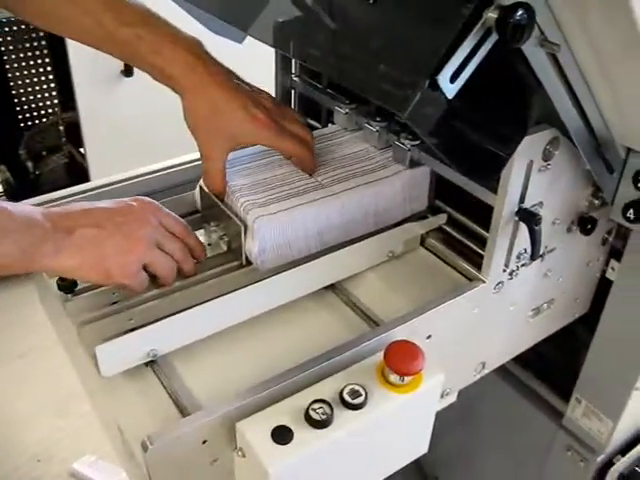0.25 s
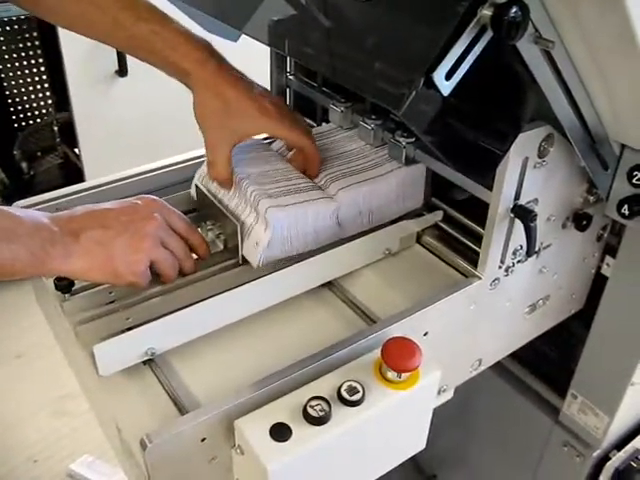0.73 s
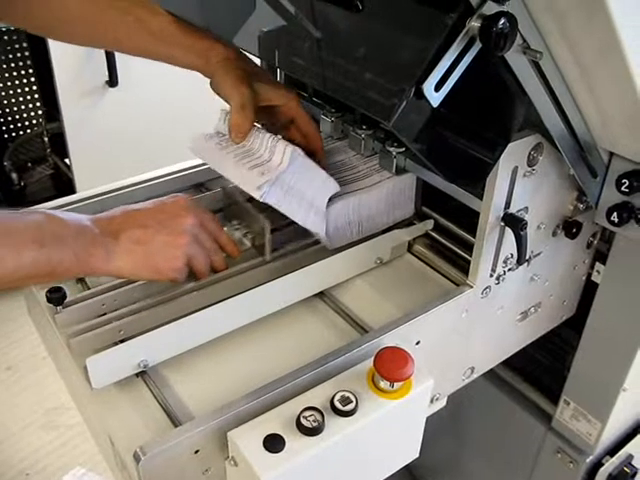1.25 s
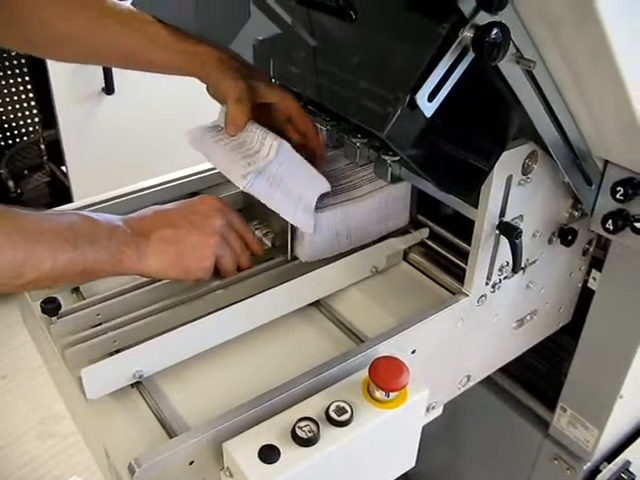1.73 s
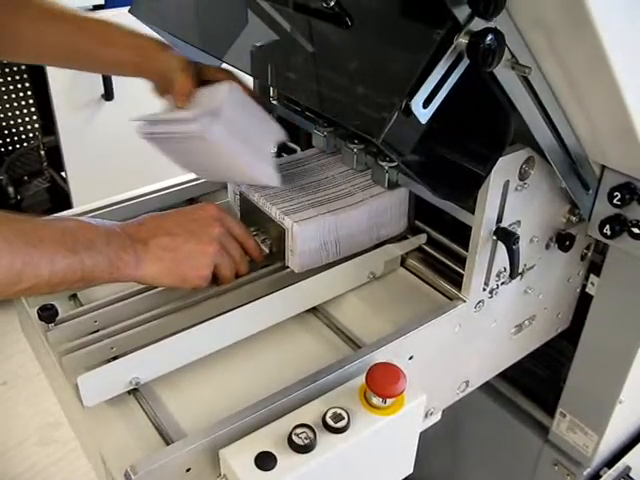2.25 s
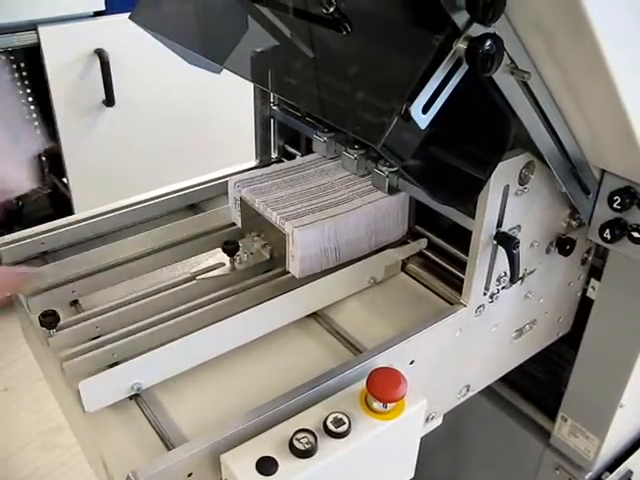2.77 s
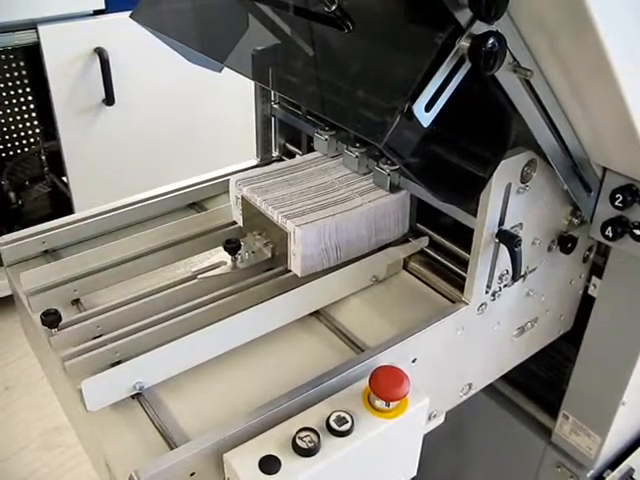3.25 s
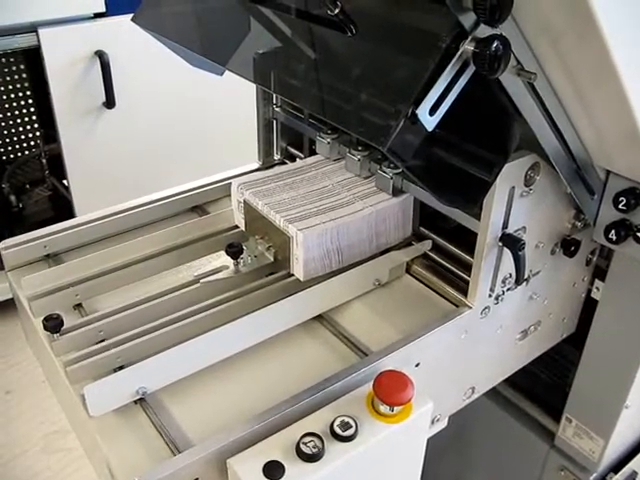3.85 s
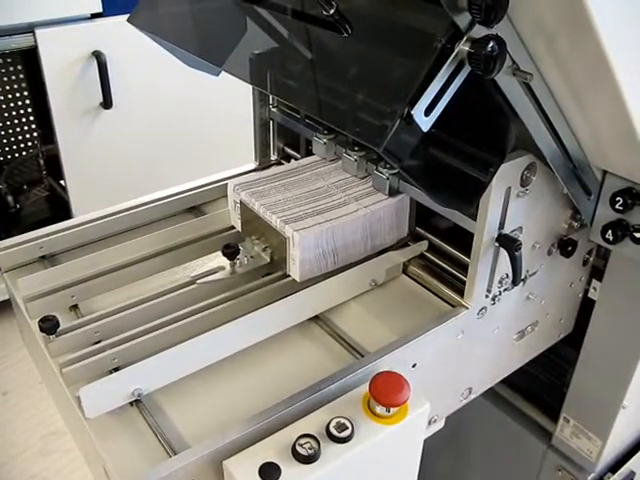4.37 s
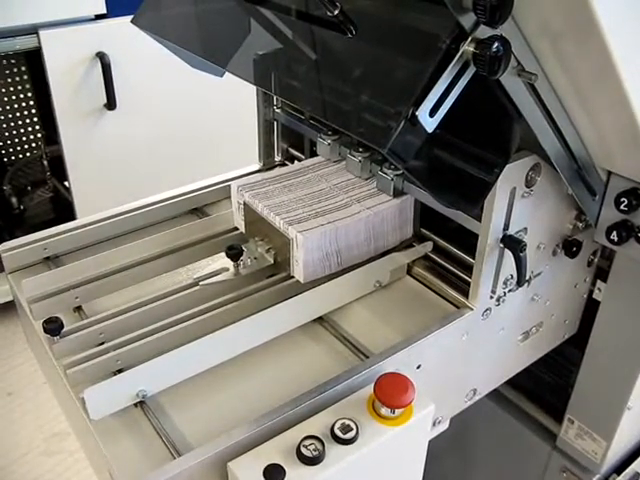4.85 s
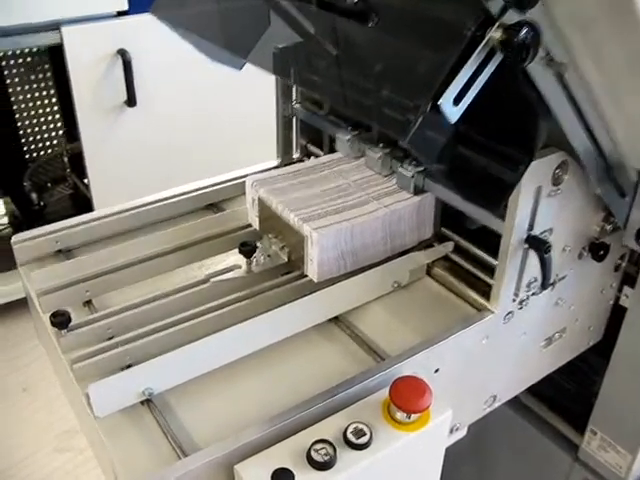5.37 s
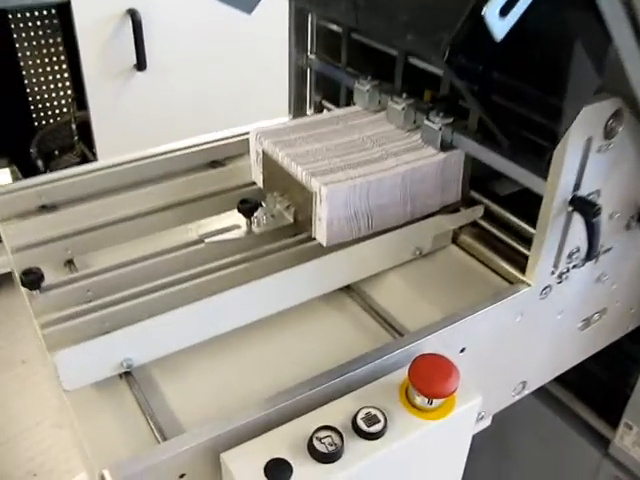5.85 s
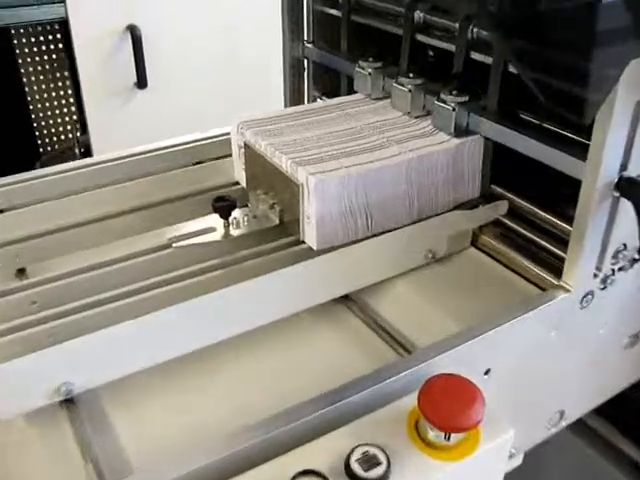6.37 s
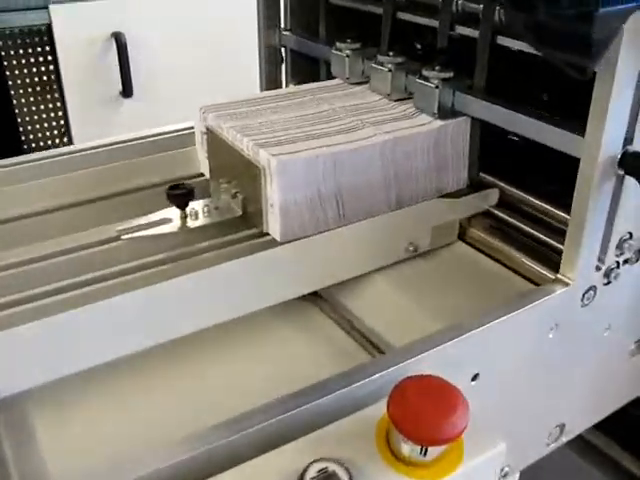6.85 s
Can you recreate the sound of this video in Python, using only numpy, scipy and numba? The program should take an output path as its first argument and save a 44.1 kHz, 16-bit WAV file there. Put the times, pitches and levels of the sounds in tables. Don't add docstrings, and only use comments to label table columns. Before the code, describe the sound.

Close to a paper folding machine in a print shop, sheets snap through rollers about seven times a second, each a tight cluster of dry cracks and rustle. Soft frame knocks and a faint low groan follow the feeder strokes. Suction air hisses over rumble. One beat nearly drops out near three seconds; later the rhythm slows slightly and bearings squeal. A small camera microphone a metre away compresses the peaks.

```python
import sys
import numpy as np
from scipy import signal
from scipy.fft import rfft, irfft
from scipy.io import wavfile
from scipy.ndimage import uniform_filter1d
from numba import njit

SR = 44100
rng = np.random.default_rng(int(sys.argv[2]) if len(sys.argv) > 2 else 0)


def inscribe(sig):
    pcm = np.round(np.clip(np.atleast_2d(sig).T, -1, 1) * 32767)
    wavfile.write(sys.argv[1], SR, pcm.astype(np.int16))


def invert_db(level):
    return 10 ** (np.asarray(level, dtype=float) / 20)


N = 313551


def level(x, db):
    return x * invert_db(db) / np.sqrt(np.mean(x ** 2))


def resonance(x, hz, width_hz):
    return signal.lfilter(*signal.iirpeak(hz, hz / width_hz, fs=SR), x)


def roller_gap(x, modes):
    out = 0
    for j, (hz, width_hz, db) in enumerate(modes):
        gain = (-1) ** j * invert_db(db) * np.sqrt(2000 / width_hz)
        out = out + gain * resonance(x, hz, width_hz)
    return out


def walk(rate_hz):
    k = int(SR / rate_hz)
    held = np.repeat(rng.standard_normal(N // k + 1), k)
    return 1.94 * uniform_filter1d(uniform_filter1d(held, k), k)[:N]


def swell(seconds):
    t = np.arange(-3 * seconds * SR, 3 * seconds * SR) / SR
    return t, np.sqrt(2) * np.exp(-.5 * (t / seconds) ** 2)


def gate(start_s, end_s):
    t = np.arange(N) / SR
    return np.clip(np.minimum(t - start_s, end_s - t) / .015 + .5, 0, 1)


def add(out, s, x):
    i = int(s * SR)
    x = x[max(-i, 0):max(N - i, 0)]
    out[max(i, 0):max(i, 0) + len(x)] += x


# last snap t/s, last snap level/dB, third snap level/dB
SHEETS = [(0.028, -8.5, -10), (0.1743, -9.5, -7), (0.3214, -9.5, -8), (0.462, -13.5, -15),
          (0.6001, -10, -11), (0.7418, -13.5, -9.5), (0.8848, -9.5, -6), (1.0356, -11, -11),
          (1.185, -9.5, -11), (1.3219, -10, -11), (1.466, -9.5, -11), (1.6126, -10.5, -8),
          (1.7581, -11, -7), (1.9028, -11.5, -10.5), (2.0408, -8.5, -10), (2.1879, -10, -9),
          (2.3282, -8, -6.5), (2.4752, -9.5, -8.5), (2.6248, -12, -9), (2.7648, -10.5, -8),
          (2.9081, -13, -8), (3.0538, -21, -35),
          (3.2005, -12, -20), (3.3459, -8, -11), (3.4847, -8.5, -6), (3.6274, -10.5, -4.5),
                     (3.7703, -11, -8.5), (3.9137, -9.5, -13), (4.0596, -9.5, -8), (4.206, -9.5, -9),
                     (4.345, -11.5, -4), (4.502, -14.5, -6.5), (4.642, -11, -6), (4.7885, -6.5, -7),
                     (4.929, -12, -7.5), (5.0696, -10, -6.5), (5.2196, -10, -12), (5.361, -7.5, -23),
                     (5.5154, -10.5, -13), (5.6516, -11, -9), (5.819, -6.5, -14), (5.9686, -9.5, -6.5),
                     (6.1238, -8.5, -10), (6.2865, -5.5, -23), (6.4289, -6.5, -20), (6.585, -6.5, -5.5),
                     (6.7609, -12, -12), (6.9121, -6.5, -8), (7.025, -18.5, -30)]
# level/dB, scatter/dB, gain once the feed slows/dB
EARLY_SNAPS = [
    (-21.5, 1.5, 3),
    (-28, 2, 5.5),
]
SLOWING_S, FULL_SHEET_DB = 5.1, -13


def feed():
    s, last_db, third_db = np.transpose(SHEETS)
    weak_db = 2 * np.minimum(last_db - FULL_SHEET_DB, 0)
    early = []
    for db, scatter_db, slow_db in EARLY_SNAPS:
        scatter = scatter_db * rng.standard_normal(len(s))
        early.append(db + scatter + slow_db * (s > SLOWING_S) + weak_db)
    return np.transpose([s, last_db, third_db, *early]).tolist()


# [(f/Hz, width/Hz, level/dB)]
SNAPS = [
    (0.0, 0.029, -0.5, [(1310, 360, -21), (2450, 300, -1), (3820, 760, -2.5), (6460, 5000, -2)]),
    (.0129, 0.047, -3.5, [(2960, 560, -1.5), (4000, 890, 1.5), (4850, 2500, -5), (7750, 2300, -5.5)]),
    (.0258, 0.03, 0.5, [(2460, 2500, 7), (3080, 2200, 11.5), (5220, 680, 3.5), (7540, 1400, -7)]),
    (.0420, 0.087, -0.5, [(1500, 2900, -5), (2500, 1260, 1), (3070, 130, -0.5), (4630, 3500, 4)]),
    (-.038, 0.019, -2.5, [(1830, 670, 1), (3580, 1900, 7), (6000, 2200, 7.5), (8150, 1500, 5)]),
]
TRAIL_DB = -14.5


def snaps(rows):
    out, t = 0, np.arange(SR // 16) / SR
    for k, (lead_s, t60_s, rattle_db, modes) in enumerate(SNAPS):
        blows = np.zeros(N)
        for s, *dbs in rows:
            dbs = dbs + [dbs[0] + TRAIL_DB]
            grains = rng.standard_normal(len(t)) * invert_db(2.34 * rng.standard_normal(len(t)))
            blow = invert_db(rattle_db - 8.5) * grains * invert_db(-60 * t / t60_s)
            blow[0] += 1
            blow[int(.0024 * SR)] -= .55
            add(blows, s - lead_s, invert_db(dbs[k]) * blow)
        out = out + roller_gap(blows, modes)
    return invert_db(13) * out


CRACK_HZ, CRACK_S, CRACK_DB = 1950, .0006, 9.5
PLATE_GAP_S, PLATE_ECHO_DB, PLATE_LOSS_DB = .0008, -7.5, -1.0


def cracks(rows):
    t = np.arange(-CRACK_S * SR, .008 * SR) / SR
    trip = np.arange(8)
    out = np.zeros(N)
    for s, db, *_ in rows:
        scatter = rng.standard_normal(8)
        delays_s = PLATE_GAP_S * (trip + 0.1 * scatter * trip ** .5)
        echoes_db = PLATE_ECHO_DB + PLATE_LOSS_DB * np.arange(7) + 2 * scatter[1:]
        gains = np.append(1, invert_db(echoes_db))
        x = (np.pi * CRACK_HZ * (t - delays_s[:, None])) ** 2
        pulses = (1 - 2 * x) * np.exp(-x)
        add(out, s, invert_db(1.61 * db + CRACK_DB) * (gains @ pulses))
    return out


# [(f/Hz, width/Hz, level/dB)]
BUCKLING = (0.0083, 0.016, -13.5, [(1840, 550, 2.5), (2330, 770, 4), (3230, 1000, 2), (3850, 320, -2),
            (5400, 2800, -5.5)])


def rustle(rows):
    lead_s, half_s, rustle_db, modes = BUCKLING
    t, bell = swell(half_s)
    effort = np.zeros(N)
    for s, *dbs in rows:
        add(effort, s - lead_s + t[0], invert_db(np.mean(dbs[:3])) * bell)
    grains = effort * rng.standard_normal(N) * invert_db(2.7 * rng.standard_normal(N))
    return invert_db(rustle_db) * roller_gap(grains, modes)


# t/s, blow level/dB, bounce level/dB, return level/dB
FEEDER = [(.038, -24.5, -51, -35.5), (1.907, -26, -34, -28.5), (2.922, -25.5, -37, -29.5),
          (3.922, -24, -38, -31.5), (4.076, -24.5, -33, -33), (5.226, -24, -37, -33),
          (5.391, -22, -36, -31), (5.706, -24.5, -27.5, -32), (5.995, -23.5, -24.5, -33),
          (6.165, -28, -24.5, -31), (6.342, -32, -20.5, -40), (6.492, -29, -21, -35),
          (6.652, -32, -23.5, -46)]
STROKE_S = .146


def strokes():
    rows = np.transpose(FEEDER)
    number = np.append(0, np.cumsum(np.round(np.diff(rows[0]) / STROKE_S)))
    return [np.interp(np.arange(number[-1] + 1), number, column) for column in rows]


# lag t/s, lag scatter t/s, level scatter/dB
KNOCKS = [
    (0.0, .002, 0.8),
    (.034, .004, 1.8),
    (.064, .008, 1.8),
]
KNOCK_S, PANEL_HZ, PANEL_SCATTER_HZ, PANEL_SPLIT_HZ = .014, 677, 8, 44


def knocks():
    out = np.zeros(N)
    t, bell = swell(KNOCK_S)
    times, *levels = strokes()
    for dbs, (lag_s, jitter_s, scatter_db) in zip(levels, KNOCKS):
        for s, db in zip(times, dbs):
            chance, turns = rng.standard_normal(3), rng.random(2)
            hz = PANEL_HZ + PANEL_SCATTER_HZ * chance[2]
            beat = 1 + .75 * np.cos(2 * np.pi * PANEL_SPLIT_HZ * t + 1.5 * (turns[1] - .5))
            tone = np.sin(2 * np.pi * (hz * t + turns[0]))
            ring = invert_db(db + scatter_db * chance[1] - 4.5) * bell * beat * tone
            add(out, s + lag_s + jitter_s * chance[0] + t[0], ring)
    return out


GROAN_S, GROAN_LAG_S, GROAN_JITTER_S, GROAN_HZ, GROAN_SCATTER_HZ = .017, .056, .004, 211, 2.5
GROAN_DB, GROAN_RISE_DB_PER_S, GROAN_OCTAVE_DB, GROAN_SCATTER_DB = -41, .5, -39, 0.26


def groans():
    out = np.zeros(N)
    t, bell = swell(GROAN_S)
    for s in strokes()[0]:
        chance = rng.standard_normal(4)
        hz = GROAN_HZ + GROAN_SCATTER_HZ * chance[0]
        phase = 2 * np.pi * (hz * t + rng.random())
        db = GROAN_DB + GROAN_RISE_DB_PER_S * s + GROAN_SCATTER_DB * chance[1]
        octave_db = GROAN_OCTAVE_DB + GROAN_SCATTER_DB * chance[2]
        tone = invert_db(db + 1.2) * np.sin(phase) + invert_db(octave_db + 1.8) * np.sin(2.01 * phase)
        add(out, s + GROAN_LAG_S + GROAN_JITTER_S * chance[3] + t[0], bell * tone)
    return out


def ring(hz, width_hz, db):
    once = resonance(rng.standard_normal(N), hz, width_hz)
    return level(resonance(once, hz, width_hz), db)


# start t/s, end t/s, f/Hz, width/Hz, level/dB
SQUEALS = [(0.0, .75, 4170, 60, -38.5), (.36, .52, 11480, 40, -33), (.58, .81, 11480, 40, -32),
           (1.09, 1.17, 11480, 60, -32), (1.26, 1.54, 11480, 40, -33), (1.0, 1.2, 13180, 80, -34),
           (1.35, 1.45, 13150, 80, -35), (.5, .75, 8300, 200, -36), (3.1, 5.9, 3980, 35, -42),
           (5.97, 6.15, 3980, 50, -39), (6.24, 6.37, 3985, 30, -33), (6.25, 6.5, 4200, 120, -38),
           (6.55, 6.8, 4180, 70, -31), (6.68, 6.86, 3980, 70, -34), (6.88, 7.2, 3980, 35, -34),
           (6.8, 7.2, 4190, 90, -36), (6.74, 6.89, 8330, 200, -28), (6.95, 7.2, 8300, 200, -32),
           (6.77, 7.2, 12450, 400, -35), (6.8, 6.9, 510, 25, -41), (6.94, 7.2, 512, 20, -37)]


def squeals():
    return sum(gate(start_s, end_s) * ring(*mode) for start_s, end_s, *mode in SQUEALS)


# f/Hz, width/Hz, level/dB
HOUSING = [(141, 14, -57), (214, 50, -52), (350, 25, -50), (434, 35, -53), (524, 18, -47), (1262, 40, -47),
           (1939, 14, -51), (2395, 110, -40.5), (3413, 80, -43), (3975, 50, -46), (4170, 50, -42),
           (11500, 260, -41)]
# f/Hz, width/Hz, level/dB
AIR_JET = (8300, 300, -38)
# f/Hz, width/Hz, level/dB
NOZZLE = (12200, 1300, -33)
# f/Hz, width/Hz, level/dB
PANEL = (676, 90, -39.5)
FEED_STOP_S = 6.72


def housing():
    steady = sum(invert_db(1.5 * walk(12)) * ring(*mode) for mode in HOUSING + [AIR_JET])
    return steady + ring(*NOZZLE) + gate(-1, FEED_STOP_S) * ring(*PANEL)


# f/Hz, density level/dB per Hz
AIR = [(25, -27), (75, -25), (144, -13.5), (300, -7.5), (586, -5), (900, -5), (1600, -4.5), (2600, -3),
       (4200, -7.5), (7500, -7.5), (12300, -4.5), (14000, -4.5), (14900, -9), (16000, -14.5)]
# t/s, drive level/dB, air level/dB
DRIFT = [(0.0, -30, -25), (1.4, -31.5, -26), (1.84, -30, -25), (4.49, -30.5, -25), (6.38, -28.5, -24.5),
         (6.83, -32.5, -25.5), (7.11, -35, -23.5)]


def air():
    hz = np.maximum(np.arange(N // 2 + 1) * SR / N, 1)
    air_hz, density_db = np.transpose(AIR)
    shape = invert_db(np.interp(np.log(hz), np.log(air_hz), density_db))
    noise = rfft(rng.standard_normal(N) * invert_db(1.6 * rng.standard_normal(N))) * shape
    drift_s, *columns = np.transpose(DRIFT)
    curves = [np.interp(np.arange(N) / SR, drift_s, column) for column in columns]
    drive_db, air_db = [curve - curve.mean() for curve in curves]
    out, shared = 0, walk(40)
    for octave in np.arange(4, 14.6, .5):
        share = np.clip(1 - 2 * np.abs(np.log2(hz) - octave), 0, 1)
        high = np.clip((octave - 10.5) / 2.5, 0, 1)
        db = (1 - high) * drive_db + high * air_db + .5 * shared + 0.38 * walk(14)
        out = out + invert_db(db) * irfft(noise * share, N)
    return level(out, -21.5)


def scene():
    rows = feed()
    paper = snaps(rows) + cracks(rows) + rustle(rows)
    t = np.arange(SR // 3) / SR
    shop = rng.standard_normal(len(t)) * invert_db(-60 * t / 0.23) * (t > .008)
    echo = invert_db(-38.0) * signal.fftconvolve(paper, shop)[:N]
    return (paper + echo + knocks() + groans() + squeals() + housing() + air())[None]


@njit
def duck(x, top, power, release):
    y, e = np.empty(len(x)), top
    for i in range(len(x)):
        y[i] = x[i] * (top / e) ** power
        e = max(abs(x[i]), top, e - (e - top) * release)
    return y


def low_pass(x):
    return signal.sosfilt(signal.butter(12, 16110, fs=SR, output="sos"), x)


def record(dry):
    x = duck(dry[0], 0.27, 0.3, 1 / (0.024 * SR))
    passed = np.arange(N // 2 + 1) * SR / N < 15720
    mix = irfft(rfft(np.clip(x, -.98, .98)) * passed, N)
    return low_pass(mix[None])


dry = scene()
out = record(dry)
inscribe(out)
```